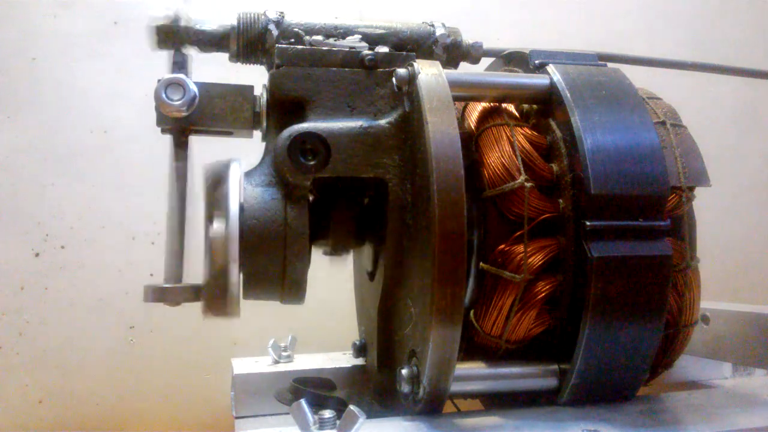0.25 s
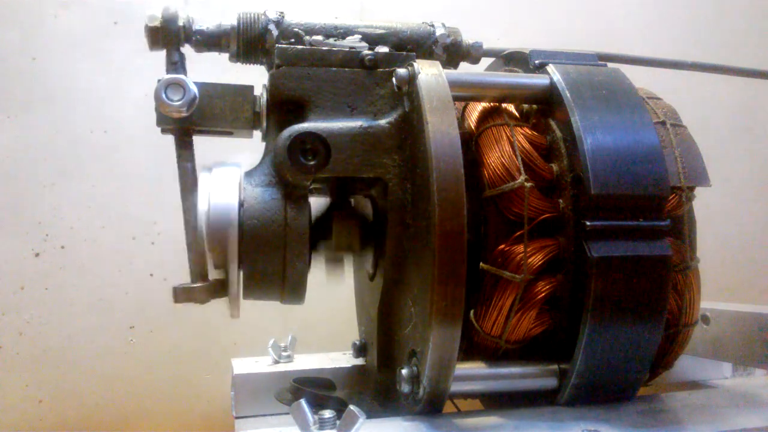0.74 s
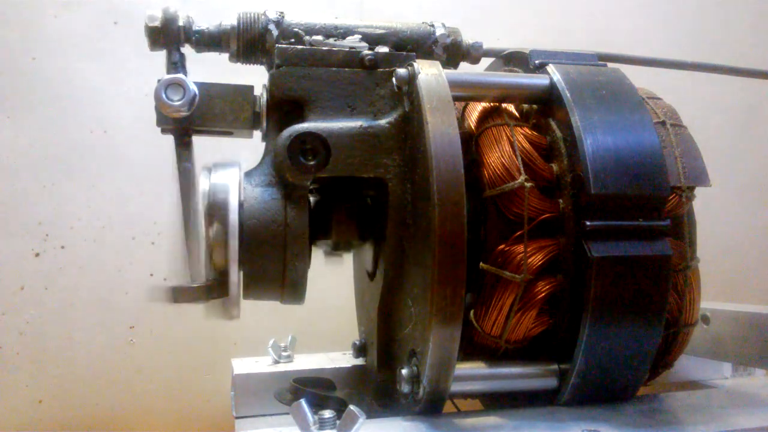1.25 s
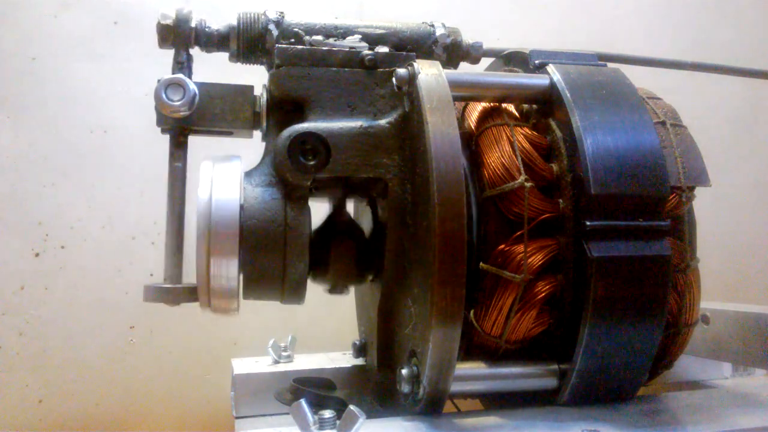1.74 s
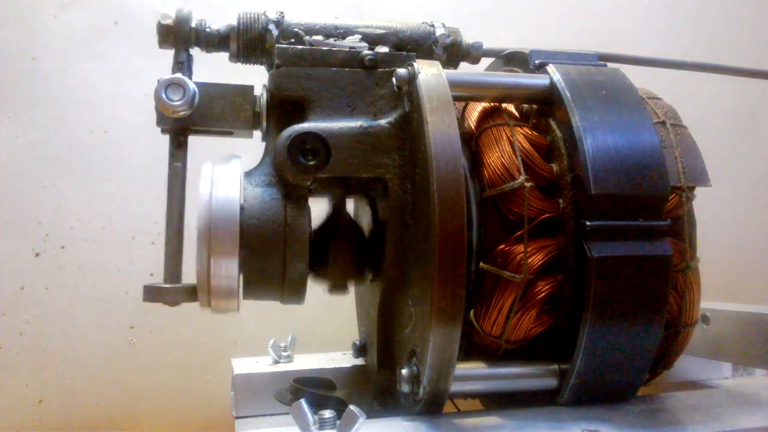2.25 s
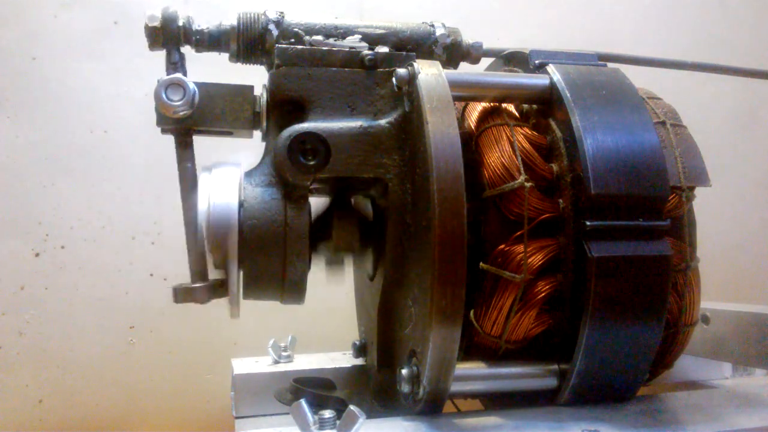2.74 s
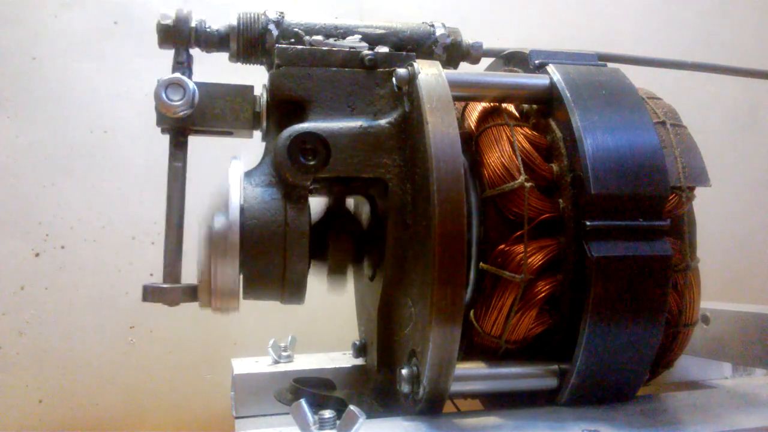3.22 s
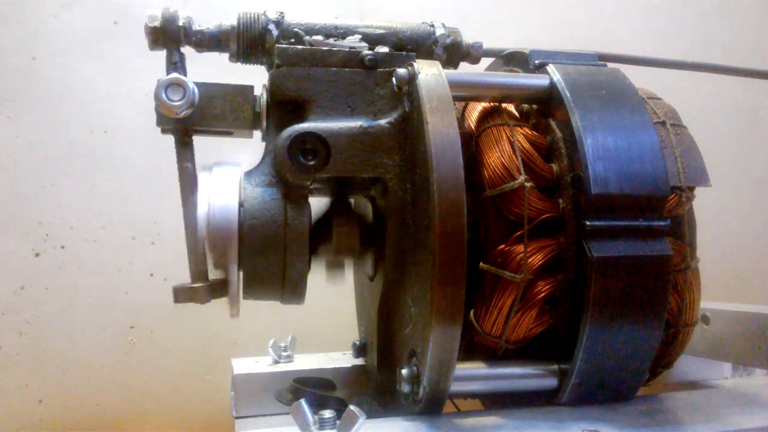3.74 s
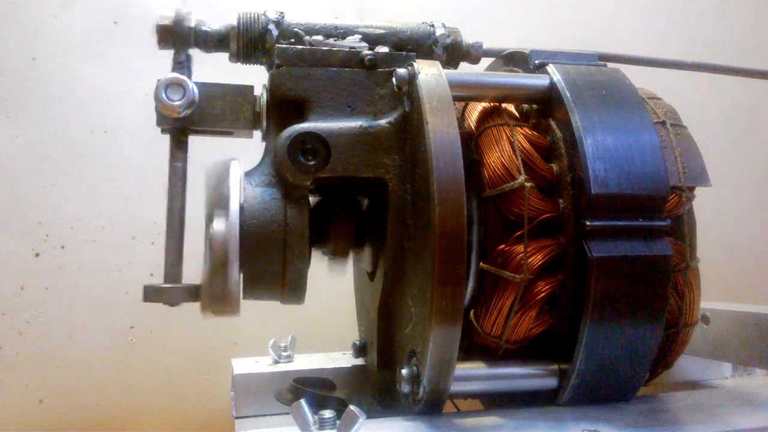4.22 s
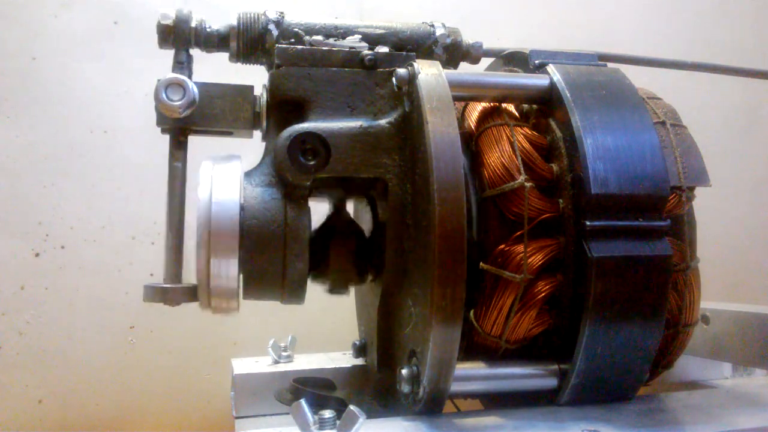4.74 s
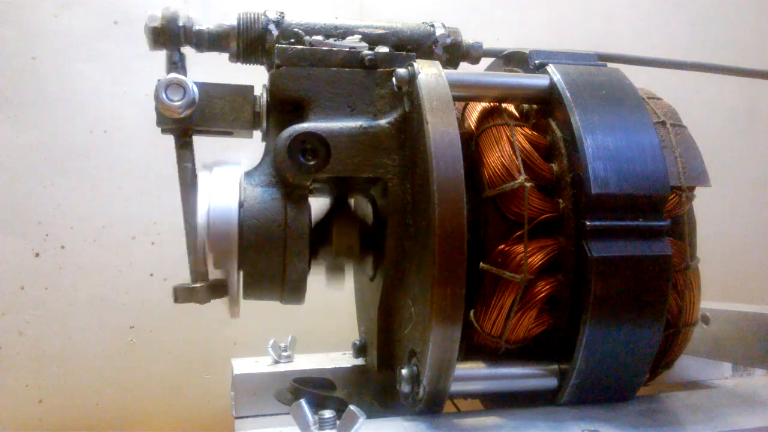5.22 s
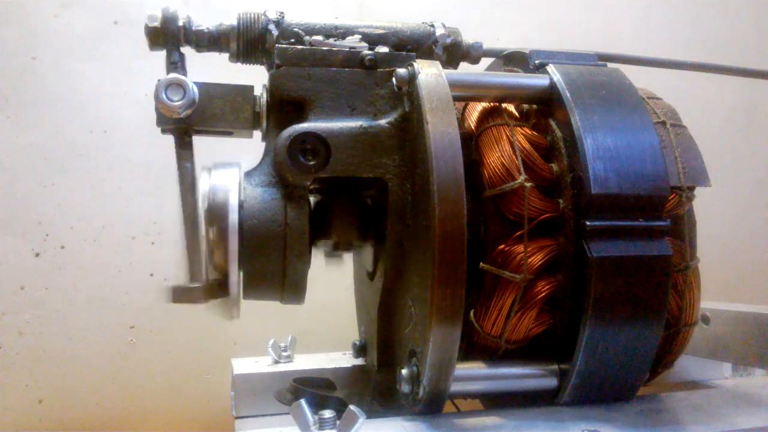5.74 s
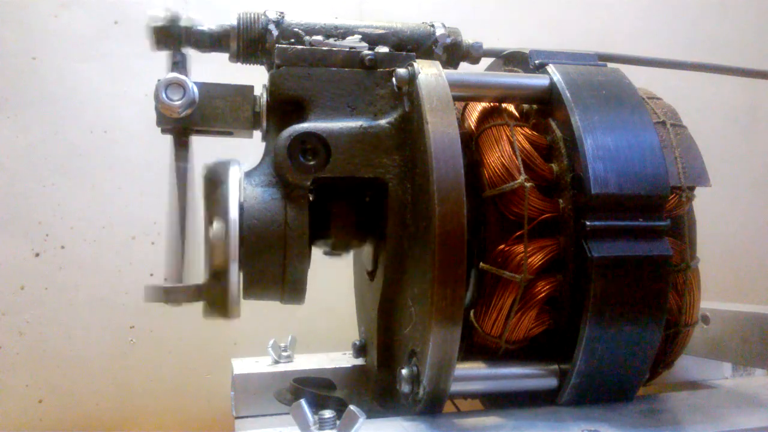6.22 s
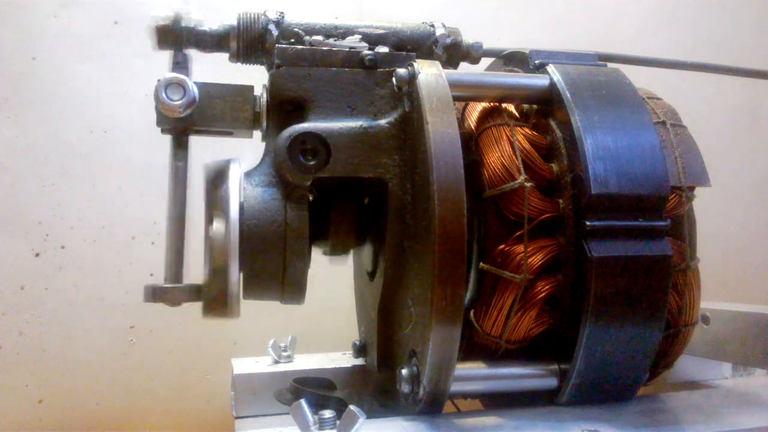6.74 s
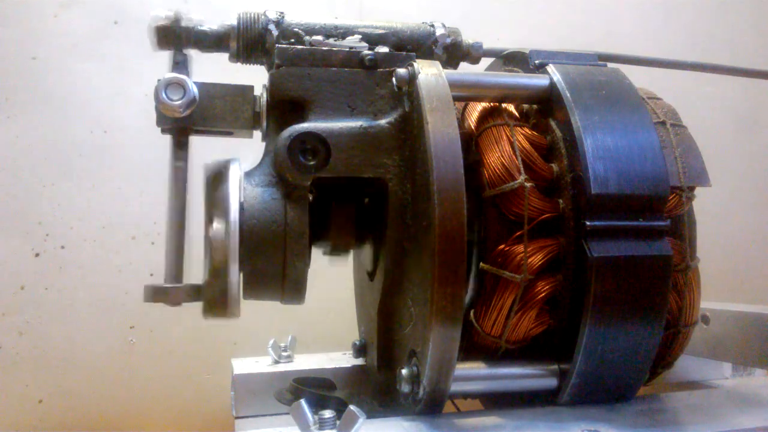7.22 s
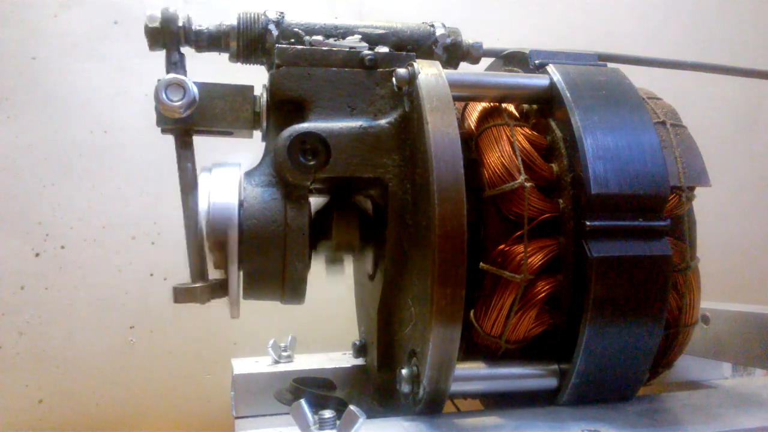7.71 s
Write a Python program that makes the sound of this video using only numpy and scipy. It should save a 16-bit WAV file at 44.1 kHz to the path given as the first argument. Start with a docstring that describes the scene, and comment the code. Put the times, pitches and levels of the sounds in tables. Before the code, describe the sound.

A small steam engine chuffs in a fast, even rhythm with sizzling hiss and metallic clatter, gradually slowing and getting quieter.

```python
"""A small single-cylinder steam engine turns an old motor rotor on a bench, slowing as its pressure falls.
Each turn, steam sizzles past the open inlet valve, then the exhaust port lets go with a puff and a hiss.
The linkage knocks at fixed crank angles and rings the casting. A leak, bearing rumble and a small room
lie behind. The bench hums, swelling whenever a multiple of the stroke rate meets its resonance."""
import sys
import numpy as np
from scipy import signal
from scipy.fft import rfft, irfft
from scipy.io import wavfile
from scipy.ndimage import uniform_filter1d

SR = 44100
rng = np.random.default_rng(int(sys.argv[2]) if len(sys.argv) > 2 else 0)


def inscribe(sig):
    """Save sig as 16-bit PCM at rate SR to the path in sys.argv[1].

    A 1-D sig is mono; a 2-D sig holds one channel per row.
    Samples are clipped to [-1, 1] before scaling.
    """
    pcm = np.round(np.clip(np.atleast_2d(sig).T, -1, 1) * 32767)
    wavfile.write(sys.argv[1], SR, pcm.astype(np.int16))


N = 351477

# modes of casting, mount and exhaust port: (frequency [Hz], level [dB], t60 [s], swell time [s])
MODES = [(147.2, -6.5, 0.13, 0.0088), (180, 3, 0.075, 0.0073), (250, -11, 0.021, 0.0083),
         (285, -10, 0.036, 0.0016), (316, -7.5, 0.076, 0.0015), (351, -11, 0.11, 0.002),
         (437.4, -10.5, 0.047, 0.0021), (477, -18.5, 0.073, 0.0016), (617, -9.5, 0.058, 0.0036),
         (700, -14.5, 0.057, 0.0043), (925, -1, 0.044, 0.011), (972.5, -3.5, 0.07, 0.0022),
         (1061.7, -6.5, 0.046, 0.01), (1190, -29, 0.024, 0.00184), (1465, -9, 0.033, 0.0032),
         (1566, -11.5, 0.052, 0.0052), (1760, -15.5, 0.031, 0.00208), (2000, -17.5, 0.043, 0.0073),
         (2757, 3, 0.014, 0.00094), (2944, -1, 0.04, 0.0027), (3098, 2.5, 0.041, 0.004),
         (3520, -36, 0.033, 0.0012), (3800, -9, 0.028, 0.0026)]
# crank speed: (time [s], speed [turns/s])
CRANK_SPEED = [(0, 8.0597), (0.5, 8.0008), (1.8, 7.5217), (2.9, 7.0793), (4, 6.8157), (5.4, 6.4105),
               (6.4, 6.1502), (8, 5.782)]
# a "share" is dB of change per dB of puff or sizzle; these levels are the pivots
PUFF_REF_DB, SIZZLE_REF_DB = -30, -25


def gain_of(db):
    """Decibels to amplitude."""
    return 10 ** (np.asarray(db) / 20)


def unit_rms(x):
    """Scales to rms 1."""
    return x / np.sqrt(np.mean(x ** 2) + 1e-20)


def at_hz(points, hz):
    """Interpolates a table over log frequency."""
    f, value = np.transpose(points)
    return np.interp(np.log(hz + 1), np.log(f), value)


def follow(rows, at):
    """Interpolates the other columns over the first."""
    place, *columns = np.transpose(rows)
    return [np.interp(at, place, column) for column in columns]


def noise(colour, size=N):
    """Noise of rms 1 with the given spectrum."""
    gain = gain_of(at_hz(colour, np.fft.rfftfreq(size, 1 / SR)))
    return unit_rms(irfft(rfft(rng.standard_normal(size)) * gain, size))


def strike(times_s, levels_db, sound):
    """Plays one sound at each time."""
    at, clicks = np.round(times_s * SR).astype(int), np.zeros(N)
    inside = (at >= 0) & (at < N)
    clicks[at[inside]] = gain_of(levels_db)[inside]
    return signal.oaconvolve(clicks, sound)[:N]


def crank(start_turns=0.498, puff_share=0.64, uneven_db=0.3):
    """One row a turn as the supply runs down: (exhaust opening [s], turn, puff [dB], sizzle [dB])."""
    # steam supply: (time [s], inlet sizzle [dB])
    supply = [(0, -15), (1, -17.5), (2.4, -22.5), (4, -26.5), (6, -29.5), (8, -31)]
    t = np.arange(-SR // 4, N + SR // 4) / SR  # spare turns at both ends
    turns = np.cumsum(follow(CRANK_SPEED, t)[0]) / SR
    turns = turns - np.interp(0, t, turns) + start_turns
    turn = np.arange(np.ceil(turns[0]), turns[-1])
    exhaust_s = np.interp(turn, turns, t)
    sizzle_db = follow(supply, exhaust_s)[0]
    puff_db = -27 + puff_share * (sizzle_db - SIZZLE_REF_DB)
    puff_scatter, sizzle_scatter = uneven_db * rng.standard_normal((len(turn), 2)).T
    return np.transpose([exhaust_s, turn, puff_db + puff_scatter, sizzle_db + sizzle_scatter])


def room(x):
    """Close, dense reflections of random sign; each band dies at its own rate."""
    # decay: (frequency [Hz], t60 [s])
    decay = [(200, 0.05), (1000, .22), (4000, 0), (14000, 0.5)]
    # reflections: (frequency [Hz], level [dB])
    colour = [(100, -12), (400, -9), (1000, -10), (3000, -8), (7000, -3.5), (14000, -15.5)]
    taps = rng.choice([-1., 1.], SR // 3) * (rng.random(SR // 3) < 0.1)
    taps[:SR // 900] = 0
    hz, t, bands = signal.stft(taps, SR, nperseg=256)
    t60_s = at_hz(decay, hz)
    bands = bands * gain_of(-60 * t / t60_s[:, None])
    tail_norm = np.linalg.norm(signal.istft(bands, nperseg=256)[1])
    equal_energy = np.sqrt(t60_s.mean() / t60_s)
    bands = bands * (gain_of(at_hz(colour, hz)) * equal_energy)[:, None]
    return signal.oaconvolve(x, signal.istft(bands, nperseg=256)[1] / tail_norm)[:N]


def bench():
    """Each stroke shoves the bench, which rings on: shoves in step build a hum, out of step they cancel."""
    exhaust_s, _, puff_db, _ = crank().T
    t = np.arange(SR) / SR

    def mode(hz, t60_s, db, share):
        sound = np.sin(2 * np.pi * hz * t) * (1 - np.exp(-t * hz * 2)) * gain_of(-60 * t / t60_s)
        return strike(exhaust_s, db + share * (puff_db - PUFF_REF_DB), sound)

    sway = mode(hz=49.7, t60_s=1.0, db=-47, share=1.07)
    thud = mode(hz=54, t60_s=0.05, db=-41, share=1.6)
    return sway + thud


def bearings(angle, puff_db, rumble_db=-47, share=1.26, load_db=3, heaviest_turns=0.12):
    """The rotor's bearings rumble, most where the crank loads them."""
    # rumble: (frequency [Hz], level [dB])
    colour = [(22, -15), (45, -6), (76, -0.5), (102, -21), (160, -3), (290, -3), (420, -8.5), (680, -11),
              (1080, -4), (1600, -8.5), (2200, -18.5), (3000, -4), (4200, -24), (12000, -47)]
    swell_db = load_db * np.cos(2 * np.pi * (angle - heaviest_turns))
    return noise(colour) * gain_of(rumble_db + share * (puff_db - PUFF_REF_DB) + swell_db)


def cylinder_head(x):
    """Standing waves in head and pipework colour the steam noise; returns rms 1."""
    # standing waves: (frequency [Hz], width [Hz], level [dB])
    waves = [(4310, 500, -1.5), (5180, 210, -8.5), (6130, 210, 2.5), (6900, 250, 3.5), (7595, 260, 4.5),
             (8320, 150, 6), (9110, 89, 10), (9900, 92, 9), (9920, 220, 12.5), (10140, 240, 8),
             (10900, 88, -2), (11170, 224, 9.5), (11800, 120, 1), (11960, 120, 9.5), (12730, 155, 9),
             (12970, 190, 7), (13840, 210, 6)]
    hz = np.fft.rfftfreq(N, 1 / SR)
    power = 1 + sum(gain_of(db) ** 2 / (1 + (2 * (hz - f) / width) ** 2) for f, width, db in waves)
    return unit_rms(irfft(rfft(x) * np.sqrt(power), N))


def leak(sizzle_db, leak_db=-18, share=0.79):
    """A steady supply-side leak fades more slowly than the jet."""
    # leak: (frequency [Hz], level [dB])
    colour = [(110, -17), (600, -14), (1200, -11.5), (1950, -23), (2500, -35), (3600, -4.5), (4400, -3.5),
              (5700, -6.5), (6200, 1), (7100, 1), (8600, -10.5), (11000, -7.5), (14500, -29), (15700, -25)]
    level_db = leak_db + share * uniform_filter1d(sizzle_db, size=20000)
    return cylinder_head(noise(colour)) * gain_of(level_db)


def ring(weights, push_s, t60_factor):
    """The modes swell and die; a slow push delays the swell, parts in contact damp them."""
    hz, db, t60_s, swell_s = np.transpose(MODES)[:, :, None]
    t = np.arange(SR // 4) / SR
    swell = 1 - np.exp(-t ** 2 / (swell_s ** 2 + push_s ** 2))
    envelope = swell * gain_of(-60 * t / (t60_s * t60_factor))
    return weights @ (gain_of(db) * envelope / envelope.max(1, keepdims=True) * np.sin(2 * np.pi * hz * t))


def radiate(x, corner_hz=137):
    """The small casting radiates almost nothing below its lowest mode."""
    hz = np.fft.rfftfreq(N, 1 / SR)
    return irfft(rfft(x) / np.sqrt(1 + (corner_hz / (hz + 1)) ** 16), N)


def linkage(uneven_db=1.4, slack_s=0.00025):
    """Play in rod and valve gear is taken up at fixed angles; each knock rings a band of modes."""
    # knocks and rubs: (angle after exhaust [turns], level [dB], centre [Hz], width [octaves],
    # push time [s], t60 factor [1], share of puff [dB/dB])
    knocks = [(.16, -15, 1090, 0.27, 0.0069, 1.06, 1.8), (.14, -4.5, 2500, 0.63, 0.0034, 0.42, 1.3),
              (0.34, -5.5, 1030, 0.27, 0.011, 0.47, 0.83), (0.39, 0.5, 217, 0.45, 0.0049, 0.3, 0.76),
              (0.39, -9, 1590, 0.36, 0.0016, 0.39, 1.2), (.51, -8.5, 170, 0.74, 0.0038, 0.64, 0.18),
              (.5, -17, 870, 0.33, .006, 0.88, 1.45), (0.721, -12.5, 203, 0.5, 0.013, 0.43, 0.42),
              (.78, -14, 1665, 0.058, .007, 0.59, 1.2), (.79, -9, 3020, 0.061, 0.015, 2.1, 1.45),
              (.8, -11, 454, 0.18, 0.028, 1.2, 0.19), (.86, -8, 1060, 0.11, 0.0061, 0.38, 0.87),
              (0.941, -13, 220, 1, 0.0065, 0.46, 0.7), (0.97, -15, 390, 0.22, 0.0046, .7, 1.79),
              (.49, -20, 375, .2, 0.0073, 1, 1.84)]
    exhaust_s, turn, puff_db, _ = crank().T
    mode_hz = np.array(MODES)[:, 0]
    out = np.zeros(N)
    for angle, db, centre_hz, octaves, push_s, t60_factor, share in knocks:
        weights = np.exp(-0.5 * (np.log2(mode_hz / centre_hz) / octaves) ** 2)
        sound = ring(weights, push_s, t60_factor)
        late, hard = rng.standard_normal((len(turn), 2)).T
        times_s = np.interp(turn + angle, turn, exhaust_s) + slack_s * late
        level_db = PUFF_REF_DB + db + share * (puff_db - PUFF_REF_DB) + uneven_db * hard
        out += strike(times_s, level_db, sound / abs(sound).max())
    return out


def exhaust_puffs(ring_db=-1, rasp_db=-7, opening_s=0.0013, rasp_s=0.012, tail_db=-12, tail_s=0.02):
    """The port opens: a pressure pulse rings every mode, with a short rasp that varies a little."""
    # rasp: (frequency [Hz], level [dB])
    colour = [(200, -1), (400, -6), (560, -4), (740, -4), (1000, 0), (2250, -13.5), (3000, 5), (4000, -6),
              (6000, -3.5), (12000, -35)]
    exhaust_s, _, puff_db, _ = crank().T
    t = np.arange(SR // 8) / SR
    gush = np.exp(-(t / rasp_s) ** 4) + gain_of(tail_db) * np.exp(-t / tail_s)
    gush = gush * (1 - np.exp(-t / opening_s))
    pulse = strike(exhaust_s, puff_db + ring_db, ring(np.ones(len(MODES)), push_s=0, t60_factor=0.88))
    rasp = strike(exhaust_s, puff_db + rasp_db, gush * noise(colour, len(t)))
    eddies = strike(exhaust_s, puff_db + rasp_db, gush) * noise(colour)
    return pulse + rasp + 0.3 * eddies


def exhaust_hiss(angle, sizzle_db, hiss_db=-1.03):
    """Spent steam bursts out, then the returning piston pushes out the rest."""
    # exhaust flow: (angle [turns], level [dB])
    flow = [(0, 4.5), (.03, 2.5), (.075, -2), (.12, -11.5), (.2, -5), (.31, -7.5), (.37, -10), (.45, -33),
            (.93, -9.5), (.97, -8), (1, 2)]
    # hiss: (frequency [Hz], level [dB])
    colour = [(300, -24), (1500, -10.5), (2300, -8.5), (3500, -9), (4800, -3.5), (5700, -13.5),
              (7200, -6.5), (7800, -1), (9100, -1), (9900, -10), (11200, -6.5), (12200, -12), (14000, -10),
              (15700, -11.5)]
    return cylinder_head(noise(colour)) * gain_of(hiss_db + sizzle_db + follow(flow, angle)[0])


def inlet_valve(angle, time_s, opens_turns=0.39, open_for_turns=0.671, shut_db=-30, base_hz=12720):
    """Flow [dB] and jet pitch [Hz]: both rise as the valve lifts and sink as it closes."""
    lift_turns, close_turns, settle_turns = 0.08, 0.11, 0.11
    since = (angle - opens_turns) % 1
    shut = 1 - np.clip(np.minimum(since / lift_turns, (open_for_turns - since) / close_turns), 0, 1)
    sag = 1 - 0.32 * shut
    overshoot = 1 + 0.1 * np.exp(-since / settle_turns)
    # pitch and speed fall together with the pressure
    speed_ratio = follow(CRANK_SPEED, time_s)[0] / follow(CRANK_SPEED, 0)[0]
    return shut_db * shut ** 2.24, base_hz * speed_ratio ** 0.53 * sag * overshoot


def inlet_jet(angle, sizzle_db, jet_db=-0.5, rush_db=-11, ref_width_hz=620, halving_db=14, flutter_db=0.86):
    """A narrow steam jet whose pitch follows the pressure, over the broad rush through the valve."""
    # rush: (frequency [Hz], level [dB])
    colour = [(1000, -33), (3600, -35), (4100, 3), (4550, 4), (5300, -2.5), (6000, -4.5), (8500, -28),
              (9700, -3), (13000, -8.5), (14500, -21)]
    hz, _, bands = signal.stft(rng.standard_normal(N), SR, nperseg=256, noverlap=192)
    at = np.linspace(0, N - 1, bands.shape[1]).astype(int)
    drift, flutter = (unit_rms(uniform_filter1d(rng.standard_normal(len(at)), size=6)) for _ in range(2))
    flow_db, pitch_hz = inlet_valve(angle[at], at / SR)
    pitch_hz = pitch_hz * (1 + 0.0075 * drift)
    # a harder jet narrows towards a whistle
    width_hz = ref_width_hz * 0.5 ** ((sizzle_db[at] - SIZZLE_REF_DB) / halving_db)
    peak = (1 + ((hz[:, None] - pitch_hz) / width_hz) ** 2) ** -0.715 / np.sqrt(width_hz)
    over_half_pitch = 2 * hz[:, None] / pitch_hz
    low_cut = over_half_pitch ** 4 / np.sqrt(1 + over_half_pitch ** 8)
    jet = cylinder_head(signal.istft(bands * peak * low_cut, nperseg=256, noverlap=192)[1][:N])
    # the rush fades half as fast as the jet
    rush = cylinder_head(noise(colour)) * gain_of(rush_db - 0.5 * (sizzle_db - sizzle_db.mean()))
    valve_db = np.interp(np.arange(N), at, flow_db + flutter_db * flutter)
    return (gain_of(jet_db) * jet + rush) * gain_of(sizzle_db + valve_db)


def scene():
    """The crank angle times the engine's sounds; both channels are the same."""
    turn, puff_db, sizzle_db = follow(crank(), np.arange(N) / SR)
    angle = turn % 1  # turns after the exhaust opens
    steam = inlet_jet(angle, sizzle_db) + exhaust_hiss(angle, sizzle_db) + leak(sizzle_db)
    engine = radiate(exhaust_puffs() + linkage()) + bearings(angle, puff_db) + steam
    return np.tile(engine + room(engine) + bench(), (2, 1))


def record(dry, ceiling=0.8, edge_hz=15780):
    """Rounds off the tallest peaks, then limits the band."""
    rounded = dry / (1 + (dry / ceiling) ** 6) ** (1 / 6)
    low_pass = signal.firwin(511, edge_hz, window=("kaiser", 9), fs=SR)
    return signal.oaconvolve(rounded, low_pass[None], "same")


dry = scene()
out = record(dry)
inscribe(out)
```